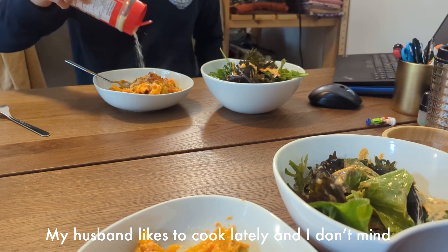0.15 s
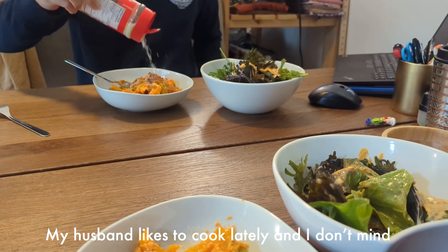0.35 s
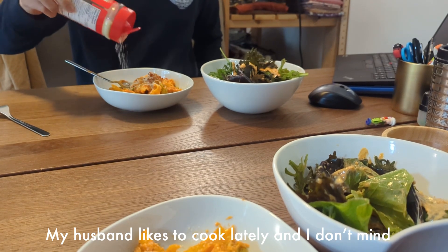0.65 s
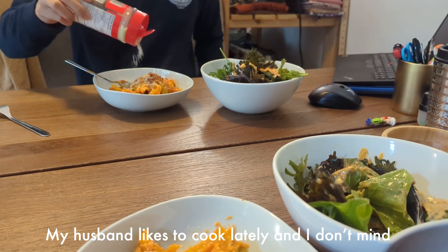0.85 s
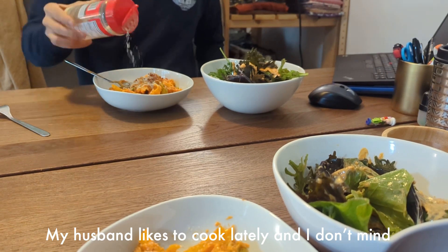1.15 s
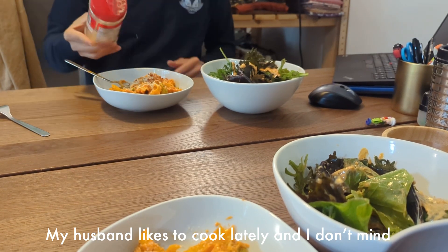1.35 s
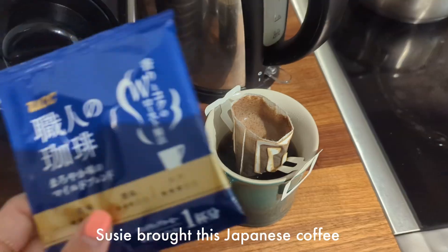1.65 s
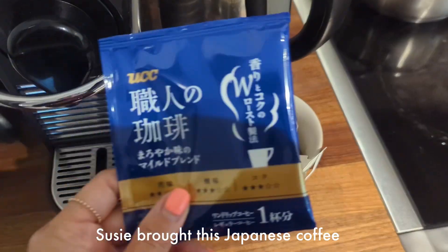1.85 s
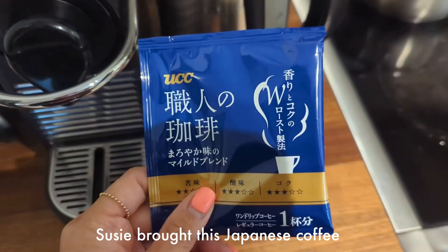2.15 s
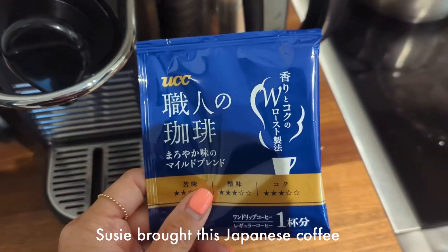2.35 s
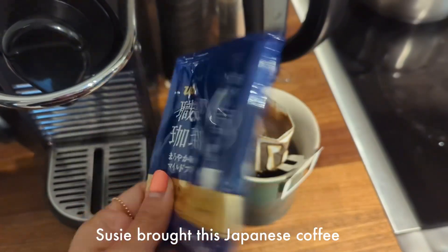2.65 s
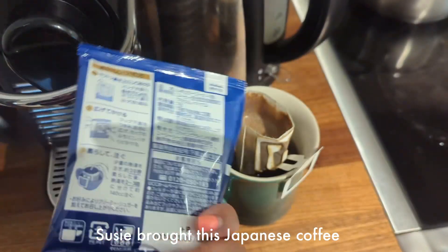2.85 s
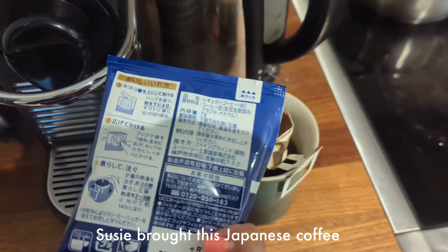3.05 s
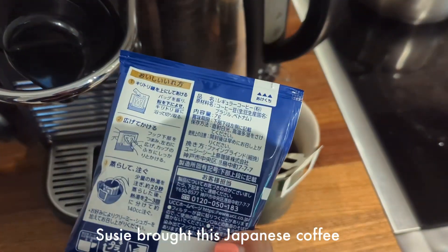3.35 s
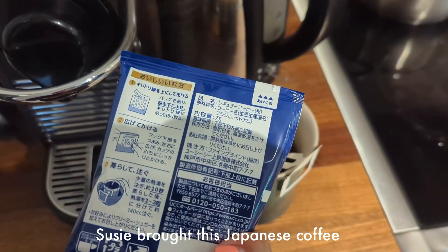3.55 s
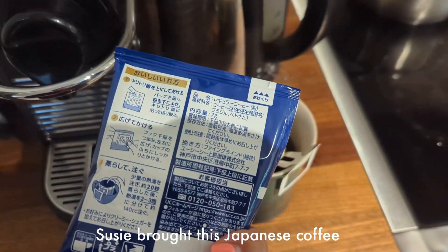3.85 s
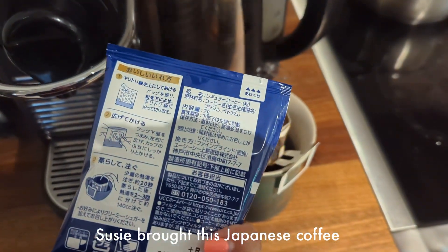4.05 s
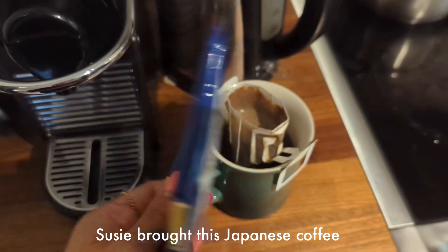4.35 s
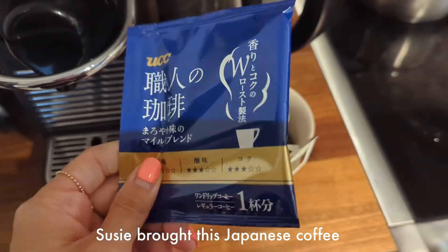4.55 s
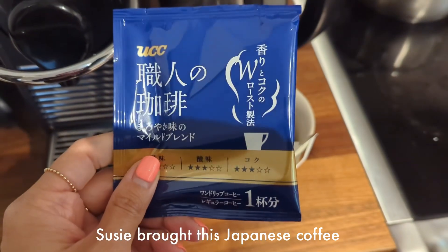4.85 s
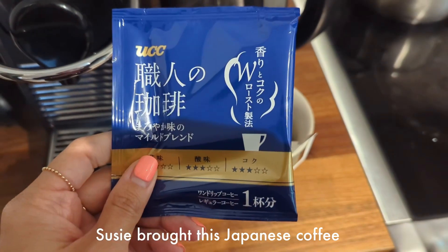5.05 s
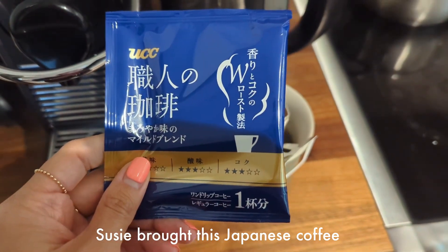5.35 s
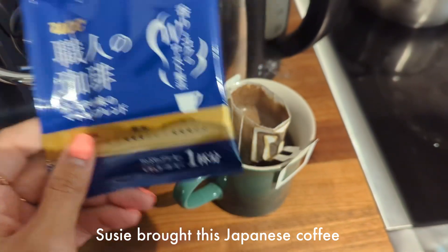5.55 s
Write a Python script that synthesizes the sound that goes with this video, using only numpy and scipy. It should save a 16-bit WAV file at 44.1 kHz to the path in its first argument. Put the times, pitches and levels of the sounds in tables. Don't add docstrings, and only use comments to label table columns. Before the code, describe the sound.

From 0 to 1.5 s, a quiet dining room: soft low traffic rumble rises and falls beneath faint air. A shaker gives barely audible dull knocks around 0.1, 0.5, 0.6 and 0.7 s, and its dry grains hiss faintly at about 1.3 s. Near-total silence lasts under a tenth of a second. At 1.6 s a kitchen fades in quickly, with a deep, slowly beating motor drone and soft kettle rumble continuing throughout. Light finger friction and a tiny nail tick come near 2 s. At 2.55-2.9 s a stiff foil packet turns close to the microphone, crackling and snapping hardest around 2.73 s, with short bright reflections. Then mostly drone, with soft bumps near 3.6 and 3.9 s. A second turn at 4.2-4.65 s crackles more sparsely and finishes with a crisp flap and slight sheet ring. Faint rubs and low counter bumps follow around 5.4 s; it ends abruptly near 5.7 s.

```python
import sys
import numpy as np
from scipy import signal
from scipy.fft import rfft, irfft, next_fast_len
from scipy.io import wavfile
from scipy.ndimage import uniform_filter1d

SR = 44100
rng = np.random.default_rng(int(sys.argv[2]) if len(sys.argv) > 2 else 0)


def voltage_ratio(decibels):
    exponent = np.asarray(decibels, float) / 20
    return 10 ** exponent


def put_to_file(sound):
    columns = np.atleast_2d(sound).T
    safe = np.clip(columns, -1, 1)
    whole_steps = np.round(safe * 32767)
    wavfile.write(sys.argv[1], SR, whole_steps.astype(np.int16))


N = 251811
T = np.arange(N) / SR
MUTE_S, BACK_S = 1.503, 1.576

# start [s], peak at 2-5 kHz [dB], brightness [dB], left minus right [dB].
CREASE_SNAPS = [(2.5659, -54, -17, -6), (2.5714, -60, 2.5, -11.5), (2.6095, -40, 0, -3.5),
                (2.6816, -35.5, -4.5, -3.5), (2.7319, -25.5, -10.5, -0.5), (2.7359, -33.5, -9, -11),
                (2.8574, -42, -6, -12), (4.2381, -38, -8, -3), (4.2936, -32.5, -6, -10),
                (4.3818, -44, -4.5, -5), (4.4054, -36, -0.5, -8.5), (4.4403, -35.5, -8.5, 2),
                (4.5421, -60, -6, -5), (4.6193, -38, -14, 6)]
# start [s], peak [dB], brightness [dB], left minus right [dB].
CREASE_SCRUNCHES = [(2.6725, -43, -0.5, -5), (2.7075, -36.5, -8.5, -6), (2.7125, -41.5, -0.5, -4.5),
                    (2.7235, -40.5, 2.5, -3), (2.7415, -39, -6.5, -4), (4.2905, -43.5, -9, -8),
                    (4.371, -49.5, -5, -7.5), (4.3875, -51, -2, -15.5), (4.4325, -52, 2, -12.5),
                    (4.4475, -39.5, -6.5, -4), (4.4675, -49, -10, 1), (4.4867, -46.5, -9, 6),
                    (4.5055, -53, -1, -13)]
# start [s], peak [dB], brightness [dB], left minus right [dB].
PACKET_FLAPS = [
    (4.6349, -32, -11.5, -6),
]
# start [s], peak [dB], brightness [dB], left minus right [dB].
NAIL_TICKS = [
    (2.0175, -53, -8, -5.5),
    (5.661, -62.5, -13, -8.5),
]
# start [s], peak [dB], pitch [Hz].
SHEET_RING = [
    (4.6193, -59, 1860),
    (4.6349, -36, 1740),
    (4.6349, -48, 1096),
]
# start [s], peak [dB], pitch [Hz].
FINGER_THUMPS = [
    (2.611, -52, 450),
    (2.682, -53, 480),
    (2.731, -51, 520),
    (2.884, -63, 900),
    (4.237, -61, 810),
    (4.293, -61.5, 698),
    (4.440, -46, 477),
]


def packet():
    sharp, sharp_energy = snaps(CREASE_SNAPS, 0.0002, 0.0014, [3.76, 4.5, 8.5, 9.5])
    soft, soft_energy = snaps(CREASE_SCRUNCHES, 0.001, 0.002, [1.5, 4.5, 5.5, 5.5])
    flap, flap_energy = snaps(PACKET_FLAPS, 0.00035, 0.0016, [13.6, 3.8, 7.9, 8.5])
    ticks, _ = snaps(NAIL_TICKS, 0.00015, 0.0036, [3.3, 4.7, 9.0, 4.6])
    tails = walls(sharp_energy) + walls(soft_energy) + walls(flap_energy)
    sheet = pair(knocks(SHEET_RING, 4.7, -14), 3)
    thumps = pair(knocks(FINGER_THUMPS, 1.5, -6), 2.7)
    return crackle() + tails + sharp + soft + flap + sheet + thumps + ticks


# left minus right [dB], per snap band.
PORT_DB = [12.5, -1, -3, 18]


def snaps(events, rise_s, fall_s, gain_db):
    out, energy, t = np.zeros((2, N + SR)), np.zeros((4, N)), T[:1500]
    shape = (1 - np.exp(-t / rise_s)) * np.exp(-t / fall_s)
    for s, peak_db, bright_db, pan_db in events:
        at = int(s * SR)
        body_db = -12 - (1 - 0.31) * (peak_db + 49)
        sizzle_db = -3.5 + 1.15 * bright_db
        for k, rel_db in enumerate([body_db, 0, bright_db, sizzle_db]):
            burst = foil(shape * rng.standard_normal(len(t)), k)
            size = voltage_ratio(peak_db + rel_db + gain_db[k])
            out[:, at:at + len(t)] += pair(size * burst / np.abs(burst).max(), pan_db + PORT_DB[k])
            energy[k, at + 90] += size ** 2
    return out[:, :N], energy


# low edge [Hz], high edge [Hz].
SNAP_BANDS = [(800, 2000), (2000, 5000), (5000, 9000), (9000, 14000)]
# centre [Hz], width [Hz], level [dB].
FOIL_MODES = [(4170, 31, -11.5), (4910, 110, 2), (6770, 150, 3.5), (7750, 29, -3), (8400, 430, -7),
              (11500, 120, -7.5), (13160, 78, -1.5)]


def foil(x, k):
    lo, hi = SNAP_BANDS[k]
    x = band(x, lo, hi, order=4)
    return x + 0.6 * sum(voltage_ratio(db) * ring(x, hz, width) for hz, width, db in FOIL_MODES if lo < hz < hi)


# T60 [s], per snap band.
ROOM_T60_S = [0.25, 0.19, 0.2, .22]
# level [dB], per snap band.
ROOM_DB = [-17, -21, -20, -24.5]


def walls(energy):
    out = 0
    for k in range(4):
        left = signal.lfilter([1], [1, -voltage_ratio(-120 / SR / ROOM_T60_S[k])], energy[k])
        noise = level(foil(rng.standard_normal((2, N)), k), ROOM_DB[k])
        out = out + np.sqrt(left) * sides(0.8 * (PORT_DB[k] - 8)) ** 0 * tail_pan(k) * noise
    return out


def tail_pan(k):
    return sides(0.8 * (PORT_DB[k] - 8))


# time [s], crackle [dB].
GRIP_TURNS = [
    [(2.55, -72.5), (2.575, -64.5), (2.6, -52.5), (2.665, -69), (2.7, -62.5), (2.735, -47.5), (2.77, -59),
     (2.82, -64.5), (2.9, -76)],
    [(4.225, -75), (4.25, -67.5), (4.28, -77.5), (4.32, -65.5), (4.43, -63), (4.5, -55), (4.53, -74),
     (4.6, -89), (4.66, -71)],
]


def crackle():
    grips = [curve(rows) for rows in GRIP_TURNS]
    hisses = []
    for grip, rows, hiss_db, dulling_db_per_s in zip(grips, GRIP_TURNS, [7.5, 0.5], [50.5, 5]):
        hisses.append(grip + hiss_db - dulling_db_per_s * np.abs(T - rows[0][0]))
    creak_db, hiss_db = np.max(grips, axis=0), np.max(hisses, axis=0)
    grains = rng.standard_normal((2, N)) * voltage_ratio(2.7 * rng.exponential(size=N) + 1.9 * walk(160))
    creak = level(band(grains, 1100, 4200), 0) * voltage_ratio(creak_db + np.array([[-2.5], [1.5]]))
    hiss = level(band(grains, 4200, 13000), 0) * voltage_ratio(hiss_db) * sides(3)
    body = level(band(grains, 400, 1000), 0) * voltage_ratio(creak_db - 15)
    return creak + hiss + body


# centre time [s], length [s], level [dB], centre [Hz].
FINGER_RUBS = [(1.67, 0.14, -78, 1390), (1.916, 0.0077, -87, 2450), (2.26, 0.032, -86.5, 2350),
               (2.24, 0.036, -97, 4800), (2.72, .04, -66, 224), (4.65, 0.03, -65.5, 1640),
               (4.66, .029, -74, 4100), (4.34, .05, -67.5, 2504), (4.79, .06, -87, 4080),
               (4.862, 0.059, -81, 2450), (4.87, .04, -91, 4600), (5.342, 0.015, -74, 2700)]
# centre time [s], length [s], level [dB], centre [Hz].
SLEEVE_BRUSHES = [(1.635, .038, -72.5, 924), (1.73, 0.19, -85, 1980), (1.774, 0.059, -84.5, 7250),
                  (2.69, 0.037, -64.5, 600), (2.745, .02, -61, 400), (4.3, 0.033, -69, 600),
                  (4.43, 0.024, -59, 451), (4.565, 0.029, -71, 8000), (5.35, .05, -71, 795),
                  (5.45, .2, -88.5, 2600), (5.505, 0.023, -83.5, 6600), (5.585, 0.015, -78.5, 5470),
                  (5.678, 0.07, -85.5, 6040)]


def fingers():
    grains = rng.standard_normal((2, N)) * voltage_ratio(2.1 * walk(150))
    out = 0
    for rows, width_share in [(FINGER_RUBS, 0.38), (SLEEVE_BRUSHES, 0.79)]:
        for s, length_s, db, hz in rows:
            width_hz = width_share * hz
            rub = level(ring(ring(grains, hz, width_hz), hz, width_hz), 0)
            out = out + voltage_ratio(db) * np.exp(-((T - s) / length_s) ** 2) * rub
    return out


# time [s], main drone [dB].
MOTOR_LOAD = [(1.66, -42.5), (2.03, -45.5), (2.41, -45.5), (2.55, -44), (2.93, -45), (3.16, -43.5),
              (3.57, -44), (3.67, -42), (4.03, -44.5), (4.28, -42.5), (5.6, -45.5), (5.71, -47)]
# frequency [Hz], rms level [dB].
MAINS_LINES = [(120.0, -68), (142.0, -72), (240.0, -80)]


def motors():
    main_db = np.interp(T, *np.transpose(MOTOR_LOAD))
    second_db = -57.5 - 12.5 * np.exp(-np.maximum(T - BACK_S, 0) / 0.7)
    main = voltage_ratio(main_db) * np.sin(2 * np.pi * 56.68 * T + 0.1 * walk(1))
    second = voltage_ratio(second_db) * np.sin(2 * np.pi * 43.36 * (T + 0.01) + 0.067 * walk(3))
    mains = 0
    for hz, db in MAINS_LINES:
        mains = mains + voltage_ratio(db + 2.5 * walk(4)) * np.sin(2 * np.pi * hz * T + 0.4 * walk(3))
    return np.sqrt(2) * (pair(main + second, 1.6) + pair(mains, -1.1))


# frequency [Hz], density [dB per Hz].
KITCHEN_AIR = [(25, -15), (45, -7), (72, 0), (98, -6), (125, -4), (150, -3), (180, -17.5), (235, -13),
               (450, -18), (700, -26), (1400, -37.5), (2800, -51.5), (12000, -60.5), (14000, -72)]
# start [s], peak [dB], pitch [Hz].
COUNTER_BUMPS = [
    (2.70, -49, 200),
    (2.919, -49.5, 99),
    (3.604, -52.5, 101.8),
    (3.879, -52, 129.1),
    (4.682, -41.5, 136),
    (5.443, -43, 150),
    (5.545, -51, 171),
]


def kettle():
    kettle_db = -60.5 - 5 * np.exp(-((T - 1.97) / 0.2) ** 2)
    mid_db = -74 + 6 * np.exp(-np.maximum(T - BACK_S, 0) / 0.22)
    rumble = air(KITCHEN_AIR, 64, 330, 2.2) * voltage_ratio(kettle_db) + air(KITCHEN_AIR, 22, 64, 0.94) * voltage_ratio(-67.5)
    still = air(KITCHEN_AIR, 330, 1600, 0.37) * voltage_ratio(mid_db) + air(KITCHEN_AIR, 1600, 16000, 1.1) * voltage_ratio(-92)
    return rumble + still + pair(knocks(COUNTER_BUMPS, 1.1, -6), 0)


# start [s], peak [dB], pitch [Hz].
SHAKER_KNOCKS = [
    (.1, -63, 1300),
    (.459, -55, 745),
    (.626, -59, 820),
    (.727, -59, 925),
    (1.245, -70, 4200),
]


def shaker():
    tip_s, hold_s, attack_s, release_s = 1.293, 0.1, 0.015, 0.067
    tip = np.clip((T - tip_s) / attack_s, 0, 1) * np.clip((tip_s + hold_s - T) / release_s + 1, 0, 1)
    hiss = voltage_ratio(-102) + tip * voltage_ratio(-84 - 32 * (T - tip_s))
    grains = air([(3000, -4), (14000, 1)], 3400, 14000, 2.2)
    grains = level(ring(ring(grains, 6200, 4300), 6200, 4200), 0)
    return grains * hiss + pair(knocks(SHAKER_KNOCKS, 3.7, 9), 0)


# frequency [Hz], density [dB per Hz].
DINING_AIR = [(200, -13), (240, -23.5), (290, -24.5), (355, -21), (510, -24), (700, -31), (950, -30),
              (1150, -39.5), (2000, -44), (3200, -54), (6000, -63), (12500, -62.5), (14000, -68),
              (15500, -85)]
# centre [Hz], width [Hz], level [dB].
DINING_MODES = [(61, 28, 0.5), (117.4, 10.4, 0), (148.2, 14, -13), (220, 30, -14)]
# time [s], rumble [dB].
TRAFFIC_SWELL = [(0, -51.5), (.25, -50), (.4, -56), (.5, -50.5), (.8, -54.5), (.95, -51.5), (1.15, -57),
                 (1.28, -53.5), (1.37, -55.5), (1.5, -55.5)]


def dining_room():
    rumble_db = np.interp(T, *np.transpose(TRAFFIC_SWELL))
    air_db = -70 + 0.5 * T + 3 * np.exp(-((T - 1.014) / 0.054) ** 2)
    push = air([(30, -9.5), (60, 2.5), (180, 0), (300, -11)], 41, 330, 1.4)
    rumble = sum(voltage_ratio(db) * ring(push, hz, width) for hz, width, db in DINING_MODES)
    still = air(DINING_AIR, 215, 15500, 0.99) * voltage_ratio(air_db)
    return level(rumble, 0) * voltage_ratio(rumble_db) * sides(-1.5) + still * sides(-1.2)


def air(spectrum, lo_hz, hi_hz, flicker_db):
    size = next_fast_len(N)
    hz = np.fft.rfftfreq(size, 1 / SR) + 1e-3
    points = np.array(spectrum, float)
    colour = voltage_ratio(np.interp(np.log(hz), np.log(points[:, 0]), points[:, 1]))
    side = np.clip(0.06 + (hz / 900) ** 1.1, 0, 1)
    mid, apart = rfft(rng.standard_normal((2, size)))
    both = colour * np.array([mid + side * apart, mid - side * apart])
    edges = lo_hz * (hi_hz / lo_hz) ** (np.arange(5) / 4)
    out = 0
    for lo, hi in zip(edges, edges[1:]):
        part = irfft(both * ((hz >= lo) & (hz < hi)), size)[:, :N]
        out = out + voltage_ratio(flicker_db * walk(9)) * part
    return out / out.mean(axis=0).std()


def knocks(events, cycles, tick_db):
    out = np.zeros(N + SR)
    t = T[:SR // 8]
    for s, db, hz in events:
        puff = ring(ring(rng.standard_normal(len(t)), 1.6 * hz, 0.5 * hz), 1.1 * hz, 1.5 * hz)
        fade = np.exp(-t * hz / cycles) * (1 - np.exp(-t / 0.002))
        out[int(s * SR):][:len(t)] += voltage_ratio(db) * fade * (np.sin(2 * np.pi * hz * t) + voltage_ratio(tick_db) * puff)
    return out[:N]


def pair(x, pan_db):
    return np.array([x * voltage_ratio(pan_db / 2), np.roll(x, 6) * voltage_ratio(-pan_db / 2)])


def sides(pan_db):
    return voltage_ratio(np.array([[pan_db / 2], [-pan_db / 2]]))


def level(x, db):
    return x * voltage_ratio(db) / np.sqrt(np.mean(x ** 2))


def curve(rows, edge_s=0.022):
    s, db = np.transpose(rows)
    return np.interp(T, np.r_[s[0] - edge_s, s, s[-1] + edge_s], np.r_[-140, db, -140])


def band(x, lo_hz, hi_hz, order=2):
    return signal.sosfilt(signal.butter(order, [lo_hz, hi_hz], "band", fs=SR, output="sos"), x)


def ring(x, hz, width_hz):
    return signal.lfilter(*signal.iirpeak(hz, hz / width_hz, SR), x)


def walk(rate_hz):
    coarse = T[::50]
    held = rng.standard_normal(1000)[(coarse * rate_hz).astype(int)]
    k = int(SR / 50 / rate_hz)
    return np.interp(T, coarse, 1.3 * uniform_filter1d(uniform_filter1d(held, k), k))


def scene():
    kitchen = packet() + fingers() + motors() + kettle()
    kitchen_fade = np.clip((T - BACK_S) / 0.047, 0, 1) * np.clip((T[-1] - T) / 0.0011, 0, 1)
    dining_fade = np.clip((MUTE_S - T) / 0.011, 0, 1)
    return kitchen * kitchen_fade + (shaker() + dining_room()) * dining_fade


def band_limit(x):
    return signal.sosfilt(signal.butter(12, 16640, fs=SR, output="sos"), x)


def record(dry):
    top = signal.ellip(6, 0.3, 50, 15600, fs=SR, output="sos")
    mix = signal.sosfilt(top, dry + voltage_ratio(-112) * rng.standard_normal(dry.shape))
    return band_limit(mix)


dry = scene()
out = record(dry)
put_to_file(out)
```